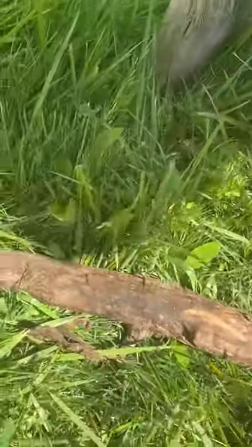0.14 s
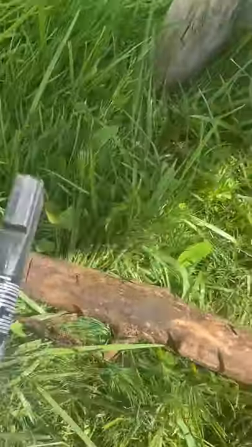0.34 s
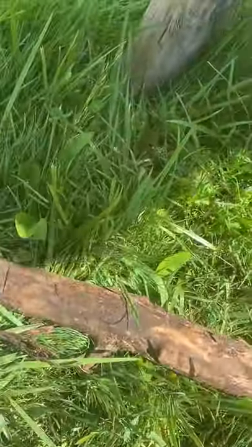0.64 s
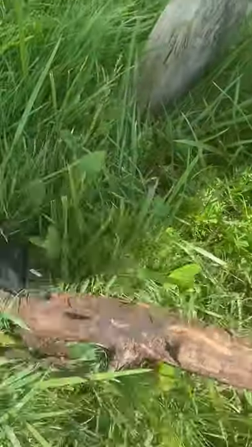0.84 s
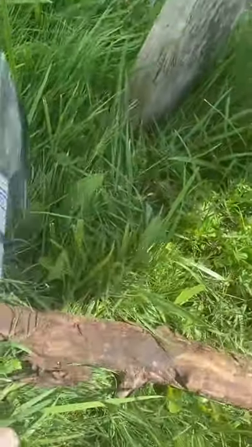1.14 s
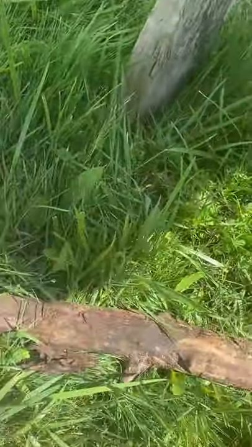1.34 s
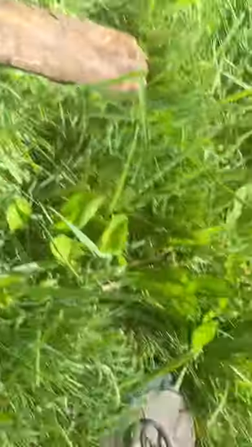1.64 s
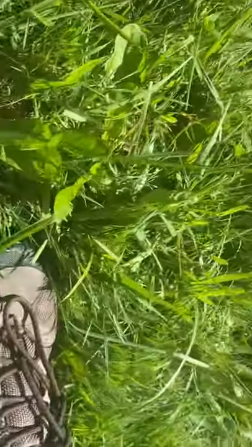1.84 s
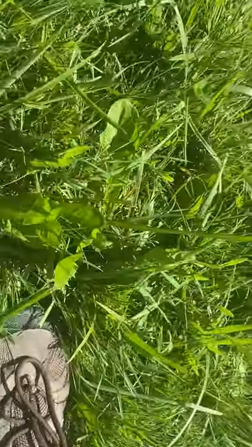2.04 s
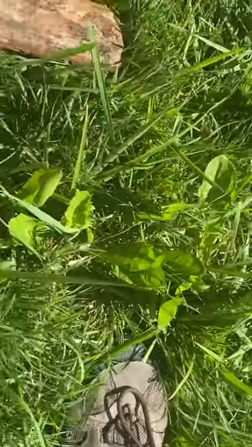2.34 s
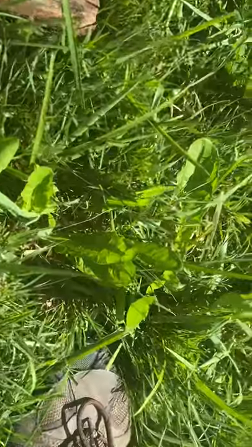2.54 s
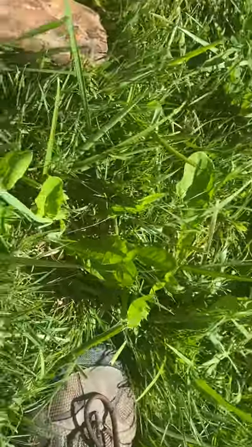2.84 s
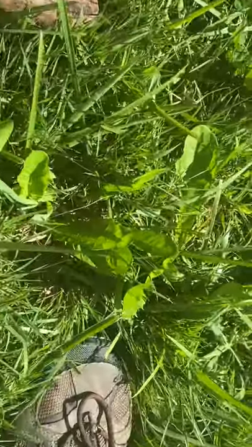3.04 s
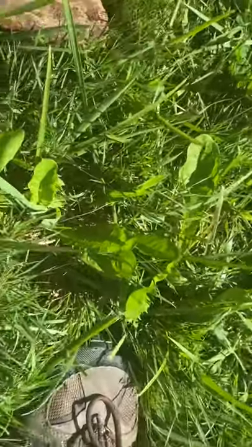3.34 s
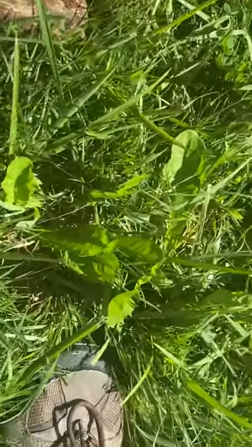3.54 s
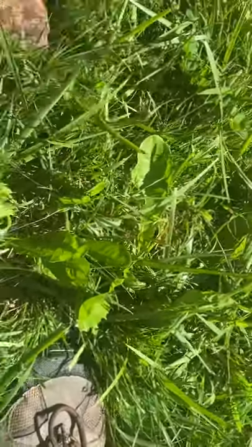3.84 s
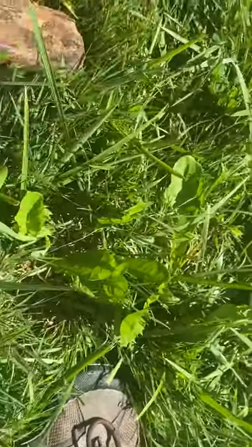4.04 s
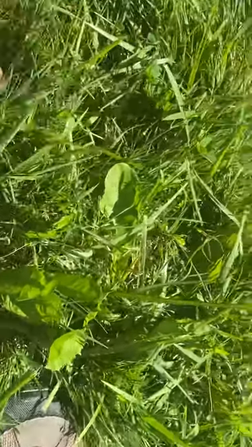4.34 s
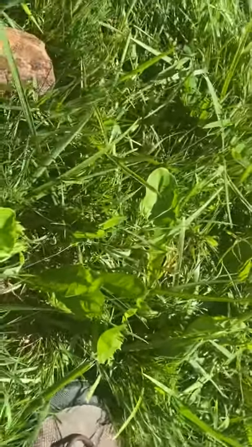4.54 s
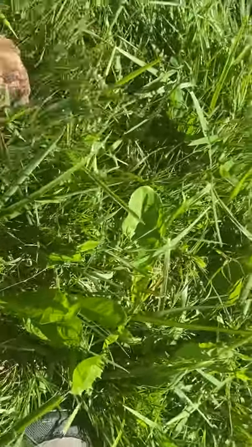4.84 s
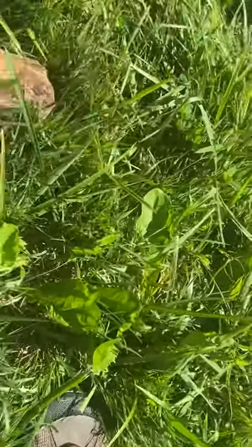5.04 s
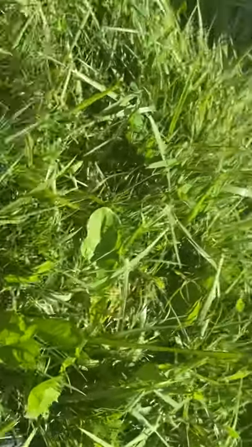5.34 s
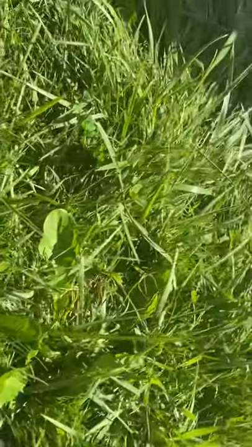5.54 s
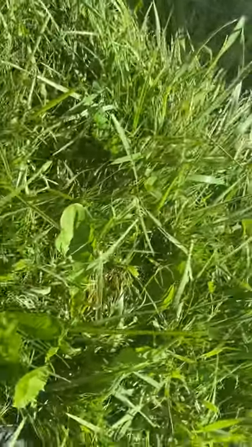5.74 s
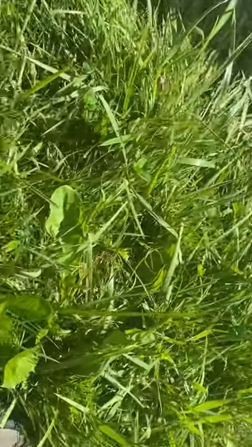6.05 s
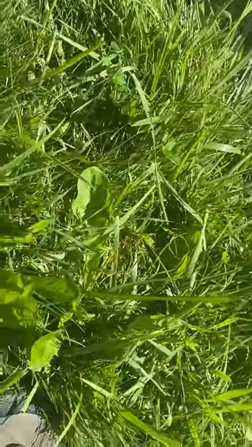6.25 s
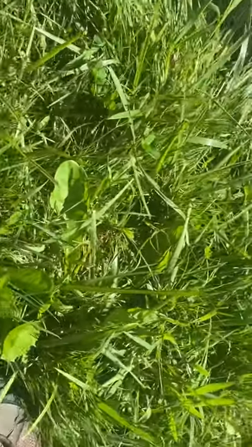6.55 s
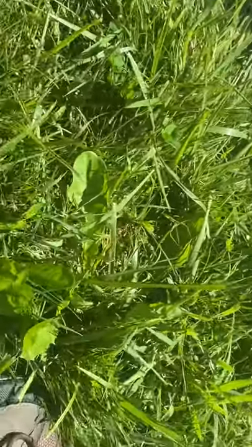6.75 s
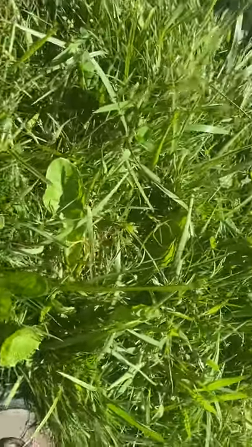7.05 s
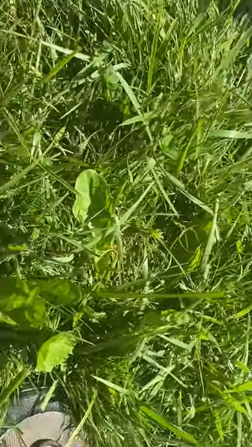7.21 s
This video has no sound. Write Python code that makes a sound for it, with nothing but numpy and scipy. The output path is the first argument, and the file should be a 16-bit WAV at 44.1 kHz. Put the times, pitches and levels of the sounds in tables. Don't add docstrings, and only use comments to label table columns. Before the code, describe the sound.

Close outdoor sound of a hatchet chopping a dead branch lying in long grass. The first three blows are spaced widely, then nine follow steadily about every half second. Each is a sharp fibrous crack with a hollow low knock, soft soil thump and brief patter of crumbs. Between them leaves brush, twigs tick and stems swish, over faint far rumble and thin bird whistles.

```python
import sys
import numpy as np
from scipy import signal
from scipy.fft import rfft, irfft
from scipy.io import wavfile

SR = 44100
rng = np.random.default_rng(int(sys.argv[2]) if len(sys.argv) > 2 else 0)


def ratio_of_db(decibels):
    return 10 ** (np.asarray(decibels, float) / 20)


def digitize_waveform(pressure):
    field = np.atleast_2d(pressure).T
    bounded = np.clip(field, -1, 1)
    quanta = np.round(bounded * 32767).astype(np.int16)
    wavfile.write(sys.argv[1], SR, quanta)


N = 325364


def unit_rms(x):
    return x / np.sqrt(np.mean(x ** 2) + 1e-20)


def in_time(rows):
    s, *columns = np.transpose(rows)
    return [np.interp(np.arange(N) / SR, s, c) for c in columns]


def at_hz(points, hz, column=1):
    points = np.array(points)
    return np.interp(np.log(hz + 1e-9), np.log(points[:, 0]), points[:, column])


def clock(length_s, lead_s=0):
    return np.arange(round(length_s * SR)) / SR - lead_s


def add(out, sound, s):
    i = max(round(s * SR), 0)
    out[i:i + len(sound)] += sound[:N - i]


def band(x, low_hz, high_hz):
    edges_hz = [low_hz, min(high_hz, .45 * SR)]
    return signal.sosfilt(signal.butter(2, edges_hz, "band", fs=SR, output="sos"), x)


def steep_band(x, low_hz, high_hz):
    return band(band(x, low_hz, high_hz), low_hz, high_hz)


def resonate(x, hz, width_hz):
    r = np.exp(-np.pi * width_hz / SR)
    gain = (1 - r * r) / 2
    return signal.lfilter([gain, 0, -gain], [1, -2 * r * np.cos(2 * np.pi * hz / SR), r * r], x)


def drift(rate):
    knots = rng.standard_normal(1000)
    return np.interp(np.arange(N) / SR * rate, np.arange(len(knots)), knots)


# pitch_hz, likeness (0 to 1)
LIKENESS = [(60, .97), (200, .88), (400, .77), (700, .25), (1300, .1), (2400, .45), (4400, .75), (8000, .4),
            (12000, 0.)]


def coloured(spectrum, patchy_db, rate, white=None):
    white = rng.standard_normal((2, 2, N)) if white is None else white
    octaves = np.log2(spectrum[-3][0] / spectrum[1][0])
    edges = spectrum[1][0] * 2 ** np.arange(-.5, octaves + .3, 1 / 4)
    out = 0
    for k, (low, high) in enumerate(zip(edges, edges[1:])):
        mid, side = band(white[k % 2], low, high)
        hz = np.sqrt(low * high)
        alike = at_hz(LIKENESS, hz)
        gain = ratio_of_db(at_hz(spectrum, hz) + patchy_db * drift(rate))
        out = out + gain * (np.sqrt(1 + alike) * mid + np.sqrt(1 - alike) * side * [[1], [-1]])
    return unit_rms(out)


# pitch_hz, density_db_per_hz
RUMBLE = [(12, -43.5), (20, -14.5), (38, -7.5), (91, -1), (151, -8.5), (179, -15), (322, -19), (496, -26),
          (635, -37), (800, -30.5), (1040, -69), (1760, -120)]
# time_s, level_db
GUST = [
    (0.0, -52),
    (0.044, -29.5),
    (0.064, -39.5),
    (0.1, -34.5),
    (0.14, -50.5),
]


def distance():
    far = ratio_of_db(-54.5) * steep_band(coloured(RUMBLE, patchy_db=0.5, rate=8.4), 25, 3000)
    blowing = np.arange(N) < GUST[-1][0] * SR
    gust = ratio_of_db(in_time(GUST)[0]) * blowing * unit_rms(band(rng.standard_normal(N), 40, 120))
    return far + band(gust, 39, 400)


STEP_S = .001


def tent(s, db, rise_db_per_s, fall_db_per_s):
    t = np.arange(0, N / SR, STEP_S) - s
    return db - np.where(t < 0, -rise_db_per_s * t, fall_db_per_s * t)


# pull_s, sway_db, pull_db, leaves_db, dying_db_per_s
PULLS = [(.41, -77.5, -79, -61, 141), (0.899, -69.5, -67, -59, 145), (2.219, -70, -73.5, -62.5, 143),
         (2.78, -80, -77.5, -61.5, 71), (3.549, -74, -78.5, -63, 147), (4.07, -75.5, -74, -58.5, 217),
         (4.471, -75, -74.5, -62, 189), (5.142, -72, -79, -60.5, 187), (5.501, -74.5, -74, -62, 113.5),
         (6.049, -75, -74, -63.5, 171), (6.52, -77.5, -72, -63, 123), (7.15, -77, -70, -62, 87)]
# arrival_db, growth_db_per_s
SWINGS = [(-56, 505), (-58.5, 93.5), (-82, 203), (-56, 331), (-57, 439), (-68.5, 398.5), (-57, 498),
          (-61.5, 267), (-59.5, 896), (-59.5, 314), (-65.5, 301), (-65.5, 600.5)]
# time_s, rustle_db, leaves_db, rise_db_per_s, fall_db_per_s
BRUSHES = [
    (.03, -68, -52.5, 30, 297),
    (1.292, -86, -65, 895, 309.5),
    (1.7, -79.5, -61, 132, 60),
    (1.8, -81.5, -60.5, 52, 128),
    (5.85, -68.5, -59, 1495, 311),
    (7.368, -99, -61.5, 309, 596.5),
]


def stir():
    hiss, leaves, t = [], [], np.arange(0, N / SR, STEP_S)
    for (s, *_), pull, (swing_db, growth) in zip(BITES, PULLS, SWINGS):
        pull_s, sway_db, pull_db, leaves_db, dying = pull
        before = -200 * (t < s)
        sway = np.interp(t, [s + 0.058, pull_s], [sway_db, pull_db])
        hiss.append(sway - dying * np.maximum(t - pull_s, 0) + before)
        leaves.append(tent(pull_s, leaves_db, 69.5, 68) + before)
        hiss.append(tent(s + 0.044, -69, 400, 300))
        leaves.append(tent(s + 0.052, -58, 400, 300))
        sweep_db = -79 + 2.4 * (swing_db + 58.5)
        hiss.append(tent(s - .02, sweep_db, growth, 400))
        leaves.append(tent(s - .02, swing_db, growth, 400))
    for s, rustle_db, leaves_db, rise, fall in BRUSHES:
        hiss.append(tent(s, rustle_db, rise, fall))
        leaves.append(tent(s, leaves_db, rise, fall))
    return ratio_of_db(in_time(np.transpose([t, np.max(hiss, axis=0), np.max(leaves, axis=0)])))


# pitch_hz, density_db_per_hz
RUSTLE = [(1940, -33), (3300, -5), (6890, -4.5), (8560, -5), (9250, -3.5), (10200, -2.5), (11100, -8),
          (11900, -21.5), (12200, -42.5), (13400, -16.5), (15000, -20), (16000, -60), (22000, -120)]
# pitch_hz, density_db_per_hz
LEAVES = [(380, -34.5), (650, -10), (1080, -1.5), (1400, -1), (1580, 0), (2330, -2.5), (3800, -12.5),
          (4940, -37), (8360, -120)]
# time_s, level_db
RUBBING = [(0.0, -72), (0.29, -73), (0.82, -77), (1.37, -88), (1.97, -75.5), (2.52, -85), (2.69, -77.5),
           (3.1, -79), (3.33, -70.5), (3.71, -77), (4.08, -68), (4.58, -79), (5.19, -75), (5.95, -77),
           (6.12, -81.5), (6.96, -78), (7.04, -73), (7.37, -82)]


def grass():
    hiss, leaves = stir()
    grains = rng.standard_normal((2, 2, N)) * ratio_of_db(0.88 * rng.exponential(1, N))
    shiver = ratio_of_db(7.5 + 2 * drift(50))
    rustle = hiss * shiver * coloured(RUSTLE, patchy_db=2.2, rate=22, white=grains)
    leafy = coloured(LEAVES, patchy_db=5.0, rate=38)
    rub_hz, rub_width_hz, rub_mean_db = 1660, 210, -74
    rub = resonate(rng.standard_normal((2, N)), rub_hz, rub_width_hz)
    rub = unit_rms(resonate(rub, rub_hz, rub_width_hz))
    rub_db = rub_mean_db + 1.6 * (in_time(RUBBING)[0] - rub_mean_db) - 1.5 + 3 * drift(11)
    at_rest = ratio_of_db(-81.5 + 2.1 * drift(2.5)) * band(leafy, 200, 2100)
    return rustle + ratio_of_db(rub_db) * rub + leaves * ratio_of_db(-4.5) * leafy + at_rest


def puffs(rows, length_s, width, extra_db, usual_hz):
    out, shape = np.zeros(N), np.sin(np.pi * np.linspace(0, 1, round(length_s * SR)) ** 0.74) ** 1.6
    for s, db, *hz in rows:
        centre = hz[0] if hz else usual_hz
        grains = rng.standard_normal(len(shape)) * ratio_of_db(3.5 * rng.exponential(1, len(shape)))
        noise = steep_band(grains, centre / width, centre * width)
        add(out, ratio_of_db(db + extra_db) * shape * unit_rms(noise), s - .008)
    return out


# time_s, peak_db, centre_hz
SWISHES = [(0.0474, -49.5, 5320), (1.277, -54.5, 4920), (2.2393, -52.5, 4670), (2.9604, -51.5, 5150),
           (3.5029, -53, 5000), (4.0388, -57.5, 5800), (5.2084, -55, 4900), (6.245, -75, 3740),
           (6.292, -55, 4640)]


def swishes():
    return puffs(SWISHES, 0.067, 1.3, -8.0, 5000)


# time_s, peak_db
CREAKS = [(0.0634, -56), (0.1072, -58), (0.457, -61), (0.5013, -60), (0.5876, -60), (0.632, -58),
          (0.695, -55), (2.2985, -65), (2.35, -62.5), (2.4923, -59.5), (2.8904, -61.5), (3.054, -62.5),
          (3.1094, -73.5), (3.6294, -67), (3.6781, -64.5)]


def creaks():
    return puffs(CREAKS, 0.033, 1.5, -4.5, 2350) + puffs(CREAKS, 0.026, 1.12, -15.5, 4900)


# time_s, peak_db, pitch_hz,
# bright_rel_db
TICKS = [(0.858, -53, 690, -10), (1.158, -64, 1320, -10), (1.465, -52, 450, -47), (1.517, -61, 496, -33),
         (1.812, -57, 880, -20), (1.816, -64, 1496, -20), (1.873, -72, 1600, -20), (2.053, -47, 1730, -13),
         (2.053, -54, 890, -30), (2.054, -44.5, 350, -30), (2.199, -67, 1025, 15), (2.346, -62, 472, -13),
         (3.621, -60, 486.5, -17.5), (5.036, -61, 940, -12), (5.442, -68, 412, 8.5),
         (5.469, -60, 1550, -14), (5.476, -60.5, 2920, 2), (5.502, -50.5, 480, -26),
         (5.988, -59.5, 1490, 1), (6.218, -57, 509, -47), (7.103, -57.5, 1690, -2.5),
         (7.361, -56, 507, -16),
         (0.148, -38, 500, -23.5), (0.867, -49, 3060, -6), (1.936, -44.5, 903, -5),
          (2.528, -49.5, 492, -30), (2.545, -45, 399.5, -26), (2.561, -55, 2004, -0.5),
          (4.385, -58, 3134, -14), (4.771, -57.5, 1500, 3), (5.313, -61, 3020, 2.5), (5.833, -63, 2500, 4),
          (3.705, -58.5, 2200, -14), (6.355, -46, 1500, -19), (4.33, -65, 5000, 1)]


def ticks():
    out, t = np.zeros(N), clock(.04)
    for s, db, hz, bright_db in TICKS:
        puff = rng.standard_normal(len(t)) * t * np.exp(-t / 0.0028)
        low = band(resonate(puff, hz, 0.22 * hz), hz / 1.6, hz * 1.5)
        high = steep_band(puff, 3000, 11500)
        edge = ratio_of_db(bright_db + 3.5) * high / np.abs(high).max()
        add(out, ratio_of_db(db + 4.0) * (low / np.abs(low).max() + edge), s - .001)
    return out


WHIRS_DB = [-19.5, -21.5, -31, -24, -23, -26.5, -24, -20, -28, -27, -18, -24.5]


def whirs():
    out, t = np.zeros(N), clock(.02, lead_s=.02)
    for (s, db, *_), whir_db in zip(BITES, WHIRS_DB):
        rush = unit_rms(resonate(rng.standard_normal(len(t)), 1750, 200))
        add(out, ratio_of_db(db + whir_db) * rush * np.exp(t / .0025), s - .02)
    return out


# time_s, peak_db
AIR = [(0.168, -45), (0.7267, -53), (1.9545, -50), (2.5726, -27), (3.1497, -30), (3.715, -28.5),
       (4.2607, -32), (4.7995, -41), (5.3238, -37), (5.8556, -36.5), (6.3654, -32), (6.8773, -41)]


def air():
    out, t = np.zeros(N), clock(.01)
    for s, db in AIR:
        spit = steep_band(rng.standard_normal(len(t)) * t * np.exp(-t / .0006), 12300, 15300)
        add(out, ratio_of_db(db + 1.5) * spit / np.abs(spit).max(), s)
    return out


def struck(train, hz, width_hz, lone):
    firm = np.argmax(np.abs(train) > .6 * np.abs(train).max())
    drive = -1. * (np.arange(len(train)) == firm) if lone else train
    energy = np.mean(train ** 2) * np.pi * width_hz / SR
    return unit_rms(resonate(drive, hz, width_hz)) * np.sqrt(energy)


# time_s, peak_db (1.2-2.4 kHz), body_rel_db, splinter_rel_db, snap_rel_db
BITES = [(0.168, -10.5, 3.5, -33.5, -19), (0.7296, -6.5, -0.5, -30, -43.5), (1.955, -13, 7.5, -23, -28),
         (2.5727, -14, -1, -16, -4.5), (3.1502, -11, -4, -6.5, -9.5), (3.7148, -10, -3, -8.5, -8.5),
         (4.2604, -13, 2.5, -14.5, -15), (4.799, -11, -2, -13, -13.5), (5.3227, -14.5, -3.5, -8.5, -15),
         (5.8548, -12.5, 4.5, -6, -13.5), (6.3658, -15, 2.5, -9, -9.5), (6.8764, -13.5, 3, -6.5, -30)]
# low_hz, high_hz
BITE_EDGES_HZ = [
    (1200, 2400),
    (450, 1200),
    (2400, 4200),
    (4200, 8300),
    (8900, 11800),
]
BITE_FADE_S = [0.028, 0.0098, 0.008, 0.0013, .0009]
TEAR_SHARES = [0.8, .25, .7, 1.1, 1.8]
# pitch_hz, width_hz, level_db
WOOD = [(783, 72, 5.5), (1562, 600, -4.5), (1890, 140, 0), (2810, 25, -9.5), (3255, 63, -14),
        (3790, 140, -28), (5072, 330, -16), (6070, 540, -27), (9930, 290, -19), (13400, 300, -33),
        (15000, 100, -46)]
# body_hz, middle_hz, edge_hz, edge_rel_db
TONES = [(764, 1744, 2700, -29.5), (754, 1300, 2600, -24.5), (517, 1610, 2885, -7.5), (549, 1650, 2840, -5),
         (530, 1660, 2820, -6.5), (810, 1900, 2850, -3.5), (830, 1658, 2545, -4.5),
         (1005.5, 1240, 4100, -9.5), (745, 1600, 2853, -1), (937, 1240, 2627, -6), (830, 1300, 2616, -7),
         (1170, 1700, 2606, -2.5)]
# body_hz, body_rel_db, middle_hz, middle_rel_db
PARTNERS = [(910, -3.5, 1518, -3), (560, 0, 1787, 0.5), (690, -1.5, 2175, -10), (926, -9.5, 1916, 3.5),
            (780.4, -6, 1981, -3.5), (1023, -3, 2186, -9), (1106, -4.5, 2283, -4.5), (600, -2, 1841, -5.5),
            (547, -3, 1590, -9.5), (754, -1, 1820, -6), (1012, -12, 1800, -25), (739, -2, 1600, -7)]
# time_s, rel_db
FIBRES = [(0.169, -3.5), (0.1713, -2.5), (0.1745, -1.3), (0.7304, -2.55), (0.7317, 1.5), (0.7341, -2),
          (1.956, -7), (1.955, -4.5), (1.9586, 1.5), (1.9605, -2), (2.574, -5.5), (2.5754, -2),
          (2.5772, -4.5), (2.5781, -1), (3.151, 1), (3.1527, 3), (3.154, -9.5), (3.155, -9), (3.7162, -0.5),
          (3.7182, -2), (3.7196, -5.5), (3.721, -9), (4.2614, 1), (4.2633, -1), (4.2656, -4.5),
          (4.2676, -9.1), (4.7994, -22), (4.8, -1), (4.8016, 2.5), (4.8058, -11.5), (5.3254, -1.1),
          (5.3272, -1.5), (5.329, -13), (5.3301, -8.5), (5.8576, -2.5), (5.8582, -2), (5.8609, -12),
          (5.862, -11), (6.367, 1.5), (6.3664, -1), (6.368, -16), (6.371, -7), (6.8788, 3.5),
          (6.8803, -4.5), (6.8807, -2.5), (6.8835, -6),
          (2.5731, -3),
    (1.9553, -15.5),
]


def part_fibres(s, t):
    grains = rng.standard_normal(len(t)) * ratio_of_db(3.7 * rng.exponential(1, len(t)))
    snaps, tears = np.zeros((2, len(t)))
    for fibre_s, fibre_db in FIBRES:
        if abs(fibre_s - s) < .03:
            since = t - (fibre_s - s)
            tears += ratio_of_db(fibre_db - 11.5) * grains * (since > 0) * np.exp(-np.abs(since) / .0008)
            snaps[np.argmax(since > 0)] -= ratio_of_db(fibre_db)
    return snaps, tears


def bites():
    out, t = np.zeros(N), clock(.05, lead_s=.004)
    wood_levels = np.array(WOOD)[:, ::2]
    for (s, db, body, *bright), (*tones_hz, edge), partner in zip(BITES, TONES, PARTNERS):
        snaps, tears = part_fibres(s, t)
        modes = [(hz, width + .12 * hz, top_db, False) for hz, width, top_db in WOOD]
        for hz, rel_db in [(hz, 0) for hz in tones_hz] + [partner[:2], partner[2:]]:
            tone_db = 11 + rel_db - 5 * np.log2(hz / 1200) * (hz > 2400)
            modes.append((hz, 60 + 0.026 * hz, tone_db, True))
        levels_db = [0, body, edge, *bright]
        for (low, high), rel_db, fade_s, share in zip(BITE_EDGES_HZ, levels_db, BITE_FADE_S, TEAR_SHARES):
            train = (snaps + share * tears) * np.exp(-np.maximum(t - .001, 0) / fade_s)
            part = 0.2 * train
            for hz, width, top_db, lone in modes:
                if low < hz < high:
                    part = part + struck(train, hz, width, lone) * ratio_of_db(top_db - at_hz(wood_levels, low))
            part = band(part, low, high)
            level = ratio_of_db(db + rel_db - 2.0 + 3.2 * np.log2(low / 450))
            add(out, part / np.abs(part).max() * level, s - .004)
    return out


# pitch_hz, density_db_per_hz
CHIPS = [(260, -30), (450, 2), (769, -6.5), (1190, -11), (1750, -3), (2250, -18.5), (2760, -20.5),
         (7520, -25.5), (8400, -24), (10200, -4.5), (12000, -39), (15600, -75), (22000, -120)]


def chips():
    dull, bright, t = np.zeros(N), np.zeros(N), clock(.3)
    rise = np.clip(t / 0.0014, 0, 1)
    dull_fall = ratio_of_db(-13.0 - 60 * t / .075) + ratio_of_db(-49.0 - 60 * t / 0.12)
    bright_fall = ratio_of_db(-6.0 - 60 * t / 0.026) + ratio_of_db(-49 - 60 * t / 0.32)
    for s, db, body, splinter, snap in BITES:
        add(dull, ratio_of_db(db / 2) * rise * dull_fall, s)
        add(bright, ratio_of_db(0.26 * (db + splinter)) * rise * bright_fall, s)
    uneven_db = 3 * np.minimum(rng.exponential(1, N), 6) + 4 * drift(130)
    grains = rng.standard_normal((2, 2, N)) * ratio_of_db(uneven_db)
    crumbs = coloured(CHIPS, patchy_db=3.5, rate=60, white=grains)
    return dull * band(crumbs, 300, 3500) + bright * band(crumbs, 2300, 8200)


# first_crest_s, knock_db, settled_knock_hz, soil_db, handle_ring_db
STOPS = [(0.1748, -10.5, 185, -21, -57), (0.7362, -10.5, 184.4, -18.5, -50),
         (1.9613, -9, 176.1, -14.5, -45.5), (2.5798, -12.5, 160, -21, -48.5),
         (3.1568, -7.5, 197.9, -19, -42), (3.7217, -6.5, 199, -19, -49), (4.267, -7, 215.7, -22.5, -43.5),
         (4.8053, -7.0, 200.6, -20, -44), (5.3298, -5.0, 213.6, -19.5, -42),
         (5.8619, -7.5, 211.5, -21.5, -46.5), (6.3713, -9.5, 206.5, -19.5, -45.5),
         (6.8832, -6.0, 207.4, -18.5, -39.5)]


def knocks():
    out, t = np.zeros(N), clock(.4, lead_s=.005)
    heave = t - .0178
    thump = np.exp(-np.abs((heave + 0.0034) / 0.0081) ** 1.8)
    after = 0.11 * np.exp(-t / 0.052) * np.clip(heave / 0.0051, 0, 1)
    soil = -np.cos(2 * np.pi * 90 * heave) * (thump + after)
    handle = np.sin(2 * np.pi * 333 * t) * np.clip(t / 0.019, 0, 1) * ratio_of_db(-60 * (t - .07) / 0.32)
    rise, fall = np.minimum(t - .001, 0) / .003, np.maximum(t - .001, 0) / .0075
    swell = np.exp(-rise ** 2 - fall ** 2.5)
    for s, knock_db, hz, soil_db, ring_db in STOPS:
        sag = hz * (t + 0.41 * .003 * (1 - np.exp(-t / 0.0016)))
        knock = np.cos(2 * np.pi * sag) * swell
        thud = ratio_of_db(knock_db - 0.93) * knock + ratio_of_db(soil_db + 0.5) * soil + ratio_of_db(ring_db - 0.2) * handle
        add(out, thud, s - .005)
    return out


# start_s, pitch_hz, level_db, swell_s, t60_s
RINGS = [(.712, 1950, -50, .012, .03), (.745, 980, -50, .01, .14), (.742, 1600, -52, .008, .12),
         (.853, 3150, -57, .02, .08), (.868, 335, -57, .01, .2), (.18, 1620, -50, .008, .14),
         (5.447, 3100, -60, .012, .06), (5.286, 8300, -70, .008, .06), (5.288, 9100, -72, .008, .06),
         (1.967, 1610, -38, .004, .06), (.19, 2700, -48, .006, .05), (5.335, 1620, -49, .008, .1),
         (2.583, 2780, -47, .006, .08), (2.585, 1700, -50, .008, .08), (5.332, 3400, -50, .006, .06),
         (3.724, 2850, -50, .006, .07)]


def rings():
    out, t = np.zeros(N), clock(.25)
    for s, hz, db, swell_s, t60 in RINGS:
        fall = ratio_of_db(db - 60 * np.maximum(t - swell_s, 0) / t60)
        add(out, fall * np.minimum(t / swell_s, 1) * np.sin(2 * np.pi * hz * t), s)
    return out * ratio_of_db(3 * drift(90))


# time_s, peak_db
FLICKS = [(1.018, -70), (1.034, -65), (1.147, -68), (2.199, -60), (6.435, -59), (6.575, -60), (6.18, -72),
          (2.1694, -51), (2.3287, -59), (2.9393, -60), (3.629, -60), (3.952, -52), (4.1604, -62),
          (4.985, -56), (5.3994, -56.5), (5.5599, -55.5), (5.6, -55.5), (6.1491, -69), (7.2582, -53.5)]


def flicks():
    out, t = np.zeros(N), clock(.01)
    for s, db in FLICKS:
        click = band(rng.standard_normal(len(t)) * np.exp(-t / 0.00079), 1900, 9700)
        add(out, ratio_of_db(db + 4.0) * click / np.abs(click).max(), s)
    return out


# start_s, length_s, first_hz, last_hz, level_db (rms)
BIRD = [
    (1.52, .42, 4620, 4595, -75),
    (2.04, .4, 4395, 4340, -74),
    (2.45, .46, 4275, 4290, -77),
]


def bird():
    out, t = np.zeros(N), np.arange(N) / SR
    for s, length, first_hz, last_hz, db in BIRD:
        since, left = t - s, s + length - t
        sounding = np.clip(np.minimum(since, left) / .01, 0, 1)
        edge = np.clip(1 - np.minimum(since / .1, left / .14), 0, 1)
        flutter_db = 6 * np.minimum(drift(85), .6)
        hz = np.interp(t, [s, s + length], [first_hz, last_hz]) + 10 * drift(120)
        whistle = np.sin(2 * np.pi * np.cumsum(hz) / SR)
        out += sounding * ratio_of_db(db + 5.5 - 13 * edge + flutter_db) * whistle
    return out


# start_s, length_s, pitch_hz, width_hz, level_db (rms)
BLURRED = [
    (2.84, .36, 4570, 130, -78),
    (3.22, .4, 4580, 120, -80),
    (2.73, .3, 2810, 300, -76),
    (3.22, .42, 2970, 90, -81),
    (2.95, .2, 3100, 120, -81),
]


def blurred():
    out = np.zeros(N)
    for s, length, hz, width_hz, db in BLURRED:
        noise = resonate(rng.standard_normal(round(length * SR)), hz, width_hz)
        noise = unit_rms(resonate(noise, hz, width_hz))
        add(out, ratio_of_db(db) * np.hanning(len(noise)) ** .3 * noise, s)
    return out


# pitch_hz, left_minus_right_db, left_lead_radians
PORTS = [(100, .4, .2), (220, -2.0, .25), (400, -1.0, .45), (860, 2.5, 1.05), (2000, 3.3, -.75),
         (2900, 2.5, .8), (5600, .3, .5), (7600, -1.5, -1.4), (9000, -1.5, -1.8), (12000, -.6, -2.0)]


def ports(x):
    hz = np.fft.rfftfreq(N, 1 / SR)
    half = ratio_of_db(at_hz(PORTS, hz) / 2) * np.exp(.5j * at_hz(PORTS, hz, column=2) * (hz > 0))
    return irfft(rfft(x) * np.array([half, 1 / half]), N)


# time_s, peak_db, left_right_lean_db
LEANS = [(0.166, 1, -1.0), (0.728, 1, -2), (1.954, -2, 0), (2.571, -2, 0.5), (3.15, -2, -0.5),
         (3.715, -2, -0.5), (4.259, -2, 0.5), (4.798, -1, 0), (5.323, -1, -0.5), (5.855, -3, 0),
         (6.364, -4.5, 0.5), (6.876, -0.5, -0.5)]


def scene():
    small = ticks() + swishes() + creaks() + bird() + flicks() + rings() + blurred()
    lean_db = in_time(LEANS)[1]
    near = ports(bites() + knocks() + whirs() + air()) * ratio_of_db(lean_db * [[.5], [-.5]])
    return near + small * ratio_of_db([[.4], [-.4]]) + chips() + grass() + distance()


def band_limit(x):
    return signal.sosfilt(signal.butter(12, 16830, fs=SR, output="sos"), x)


# pitch_hz, width_hz, share (added or taken away)
HOUSING = [
    (1665, 240, .35),
    (2450, 260, -.5),
    (1330, 200, -.3),
    (8550, 900, -.92),
    (12100, 1200, -.95),
]


def record(dry):
    x = dry
    for hz, width_hz, share in HOUSING:
        x = x + share * resonate(x, hz, width_hz)
    x = 1.377 * np.tanh(x / 0.94)
    x = signal.sosfilt(signal.butter(2, 14000, fs=SR, output="sos"), x)
    x = signal.sosfilt(signal.ellip(8, .5, 60, 16500, fs=SR, output="sos"), x)
    return band_limit(x)


dry = scene()
out = record(dry)
digitize_waveform(out)
```